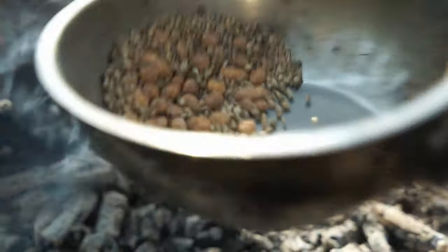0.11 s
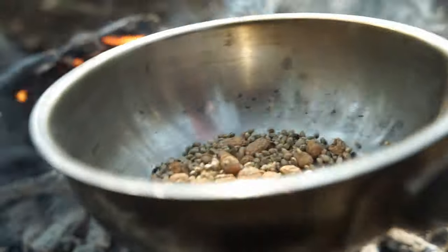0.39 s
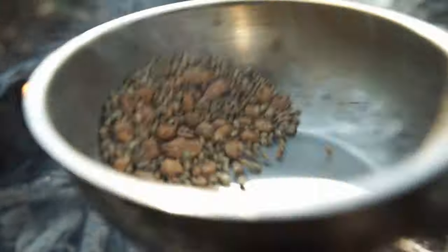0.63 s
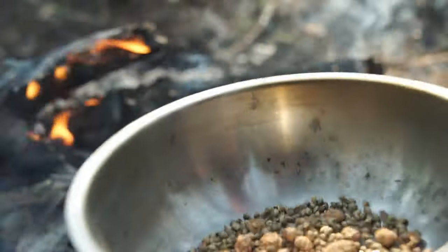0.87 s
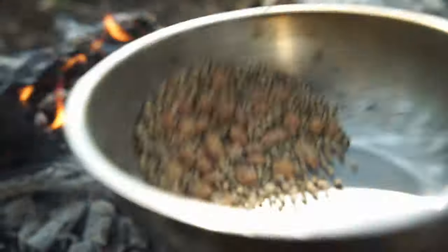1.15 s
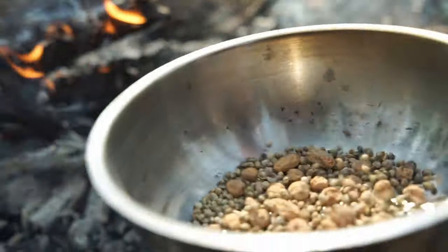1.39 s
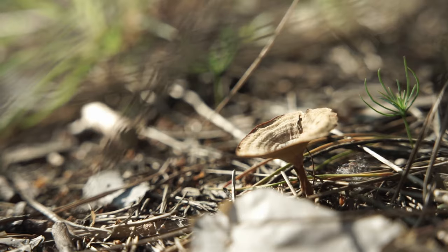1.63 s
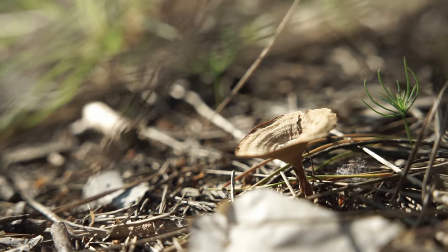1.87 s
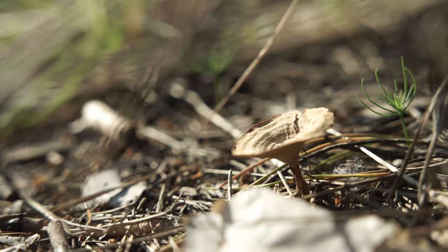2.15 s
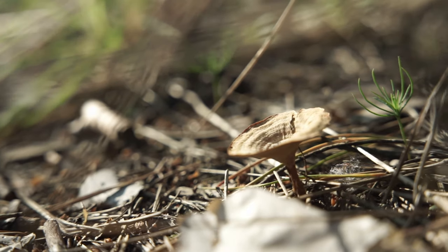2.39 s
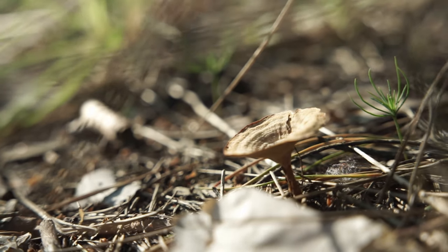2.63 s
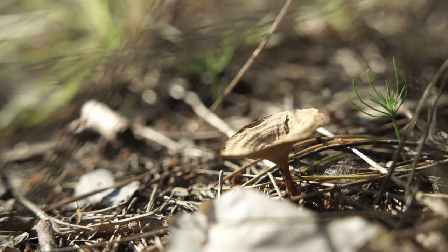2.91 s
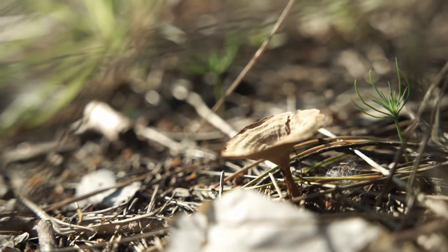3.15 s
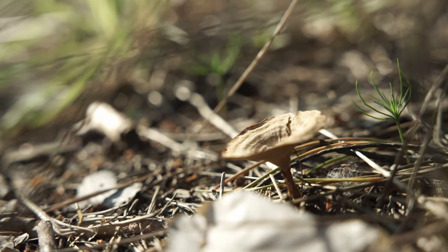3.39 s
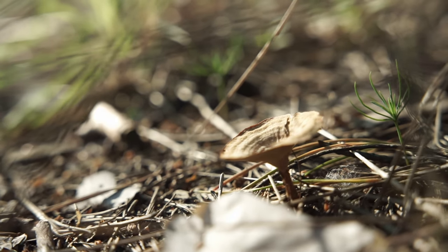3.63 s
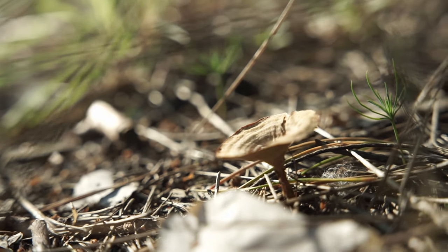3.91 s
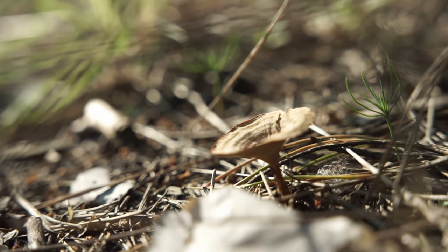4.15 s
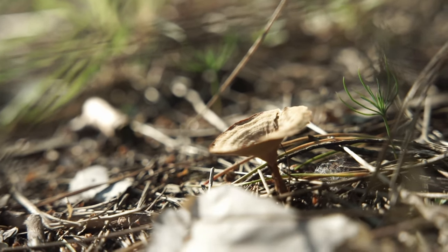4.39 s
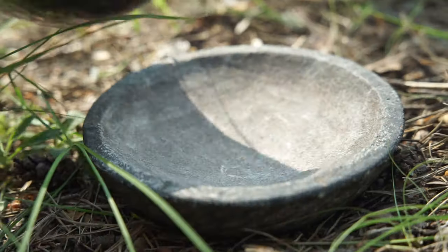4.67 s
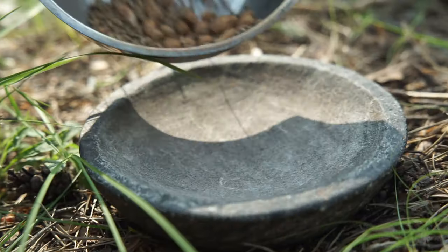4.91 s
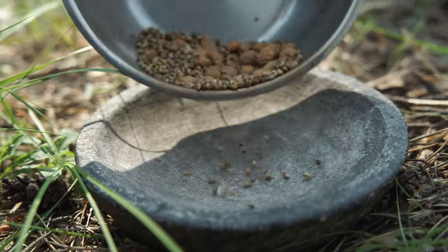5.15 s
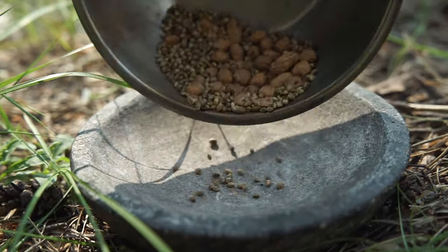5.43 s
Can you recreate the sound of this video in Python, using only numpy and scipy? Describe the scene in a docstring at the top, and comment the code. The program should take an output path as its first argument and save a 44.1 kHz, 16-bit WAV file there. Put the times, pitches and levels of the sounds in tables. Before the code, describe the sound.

Seeds and nuts are tossed rhythmically in a small steel pan with bright ringing rattles, then tipped with a thin swish into a stone bowl.

```python
"""Seeds and nuts are tossed in a small steel pan, then tipped into a stone bowl on the ground, beside a wood fire.
Random patters of impacts ring the pan's modes, thud on its floor and hiss seed on seed as the load lands and slides;
larger nuts ping out singly. In the pour the rim sings, the load swishes over the lip and seeds ping on stone.
Behind it, shaped noise makes the fire's low flutter, puffs and soft rush, and short noise spits make dry ticks."""
import sys
import numpy as np
from scipy import signal
from scipy.fft import rfft, irfft, next_fast_len
from scipy.io import wavfile
from scipy.ndimage import uniform_filter1d, map_coordinates

SR = 44100
rng = np.random.default_rng(int(sys.argv[2]) if len(sys.argv) > 2 else 0)


def persist_wave(psi):
    """Save psi, clipped to +-1, as 16-bit WAV."""
    counts = np.round(np.clip(psi, -1, 1) * 32767).astype(np.int16)
    wavfile.write(sys.argv[1], SR, np.atleast_2d(counts).T)


def boost_factor(decibels):
    """Convert a level in decibels to a linear amplitude factor."""
    exponent = np.asarray(decibels, float) / 20
    return 10 ** exponent


N = 244314

# Level of the fire background over time, dropping quieter near 1.6 s and louder again near 3.1 s.
# Each row: time in seconds, level in dB.
FIRE_LEVEL = [(0.0, -48), (0.45, -51.5), (0.69, -51.5), (1.4, -50.5), (1.56, -51), (1.64, -58.5),
              (1.84, -60.5), (2.3, -59.5), (3.02, -61.5), (3.16, -53.5), (4.78, -51), (5.0, -55.5),
              (5.31, -55), (5.54, -57)]
# Colour of the low flame flutter. Each row: frequency in Hz, relative density in dB per Hz.
FLUTTER_COLOUR = [(12, -41), (20, -12), (43, 0.5), (65, 4.5), (173, -2.5), (206, -11.5), (500, -20.5),
                  (650, -62), (1100, -120)]
# Colour of the fire's broad rush. Each row: frequency in Hz, relative density in dB per Hz.
RUSH_COLOUR = [(120, -35), (200, -3), (315, -7), (392, -11.5), (446, -12), (544, -12), (1710, -16),
               (2090, -15), (15500, -28)]
# Stereo width of the fire noise. Each row: frequency in Hz, left-right likeness from 0 to 1.
FIRE_LIKENESS = [(60, 0.96), (300, 0.75), (1000, 0.27), (3000, 0.21), (8000, 0.058)]
# Gas puffs in the fire. Each row: time in seconds, peak level in dB.
GAS_PUFFS = [(0.632, -41.5), (1.499, -49.5), (3.186, -43.5), (3.787, -49)]
# Dry ticks of stray seeds and embers. Each row: time in seconds, peak level in dB, left over right in dB,
# lower part of the tick in dB against its treble setting.
DRY_TICKS = [(0.033, -29, -6, -2), (0.2537, -29, 3, -1), (0.2907, -29, -2, 3), (0.4095, -31, 18, -5),
             (0.458, -20.5, 2, -11), (0.7677, -30, -7, -10), (0.7981, -30, -8, 7), (0.818, -22, -10.5, 9),
             (0.948, -15.5, -4, -10), (1.076, -32, -5.5, 1), (1.3244, -31, -6, 0), (1.349, -22, -14, 14),
             (1.505, -18.5, -7, -3), (1.5244, -19, -7, -7), (1.8958, -37, -6, 25), (1.986, -17.5, 3, -10),
             (2.0143, -26, -9, -12), (2.138, -31.5, 4, -21), (2.45, -35, 0, 2), (2.5696, -35.5, 1, -7),
             (2.618, -31.5, 0, -2), (2.9284, -40, -8, -11), (2.9786, -29, 0, 16), (3.11, -26, -7, -10),
             (3.51, -31, -6, 18), (3.6646, -28, -8, -13), (3.695, -36, -3, -12), (3.7524, -37, -1, -6),
             (3.999, -24.5, -5, 6), (4.1774, -34, -8, 11), (4.2704, -34, -4.5, -14), (4.2956, -35, -3, -6),
             (5.003, -36, 0, -3), (5.0659, -35, -1.5, -13), (5.24, -44, 0, -10), (5.395, -46, 0, -15)]
# Seeds dropping on the stone. Each row: time in seconds, peak level in dB.
STONE_DROPS = [(5.1106, -44), (5.12, -38), (5.1544, -44), (5.1901, -47), (5.24, -58), (5.4316, -48),
               (5.5154, -49)]
# Single larger nuts striking the steel. Each row: time in seconds, peak level in dB.
NUT_HITS = [(0.054, -38), (0.095, -22), (0.1112, -23), (0.262, -39), (0.3185, -13), (0.4038, -22),
            (0.4868, -23.5), (0.5088, -22), (0.5305, -30), (0.602, -23), (0.8095, -44), (0.822, -23),
            (0.863, -18.5), (0.8733, -8), (0.995, -33), (1.0552, -24.5), (1.0932, -22.5), (1.14, -24.5),
            (1.3413, -28), (1.3662, -31), (1.3887, -11.5), (1.417, -2), (1.468, -19), (1.512, -27),
            (1.5354, -26), (1.651, -37), (1.72, -35), (1.9159, -31), (1.9447, -24), (1.957, -23),
            (1.974, -21), (2.277, -30), (2.488, -26), (2.645, -33), (2.667, -34), (2.745, -38.5),
            (2.762, -36), (2.4769, -23), (2.98, -29), (3.0075, -27), (3.017, -24), (3.032, -22.5),
            (3.22, -35.5), (3.254, -32), (3.551, -22), (3.5793, -13), (3.63, -30), (4.0734, -42),
            (4.1022, -25.5), (4.16, -28), (4.172, -32), (4.184, -32), (4.208, -39), (4.356, -37),
            (4.456, -37), (4.522, -38), (4.883, -30), (4.908, -29), (4.914, -29)]
# Modes of the pan's bowl. Each row: frequency in Hz, width in Hz, level in dB, left over right in dB,
# phase lead of the left in radians.
BOWL_MODES = [(2887, 77, -12.5, -11, 1.1), (3036, 25, -5.5, -9, 1), (3105.4, 66, 1.5, 2, 0.2),
              (3164.5, 35.5, -2, 11.5, -0.1), (3340, 28, -0.5, 6.5, -1.8), (3770, 47, -43, 5, 16),
              (4070, 65, -23, -14, -0.5), (4400, 55, -17.5, 7, -1.5), (4710, 60, -22, 8, -0.1)]
# Modes of the pan's rim. Each row: frequency in Hz, width in Hz, level in dB, left over right in dB,
# phase lead of the left in radians.
RIM_MODES = [(5150, 89, -9, 7.5, -2.5), (5518, 38, 0, 6.5, -3), (5588, 45, 3, 2, -2),
             (7150, 140, -12.5, 3, 3.5), (7950, 110, -16.5, -11, 5.5), (8276, 25, -1, -13, 4),
             (8384, 67, -11.5, 5, -1), (10000, 16, -14, -13, 5), (11400, 120, -14.5, 4, 1.5)]
# Modes of the pan's flat floor. Each row: frequency in Hz, width in Hz, level in dB, left over right in dB,
# phase lead of the left in radians.
FLOOR_MODES = [(1070, 430, -1, 0, -0.15), (1772, 127, 1, -9, -0.33), (1925, 31, 4, -5.5, -.3)]
# Modes of the stone bowl. Each row: frequency in Hz, width in Hz, level in dB, left over right in dB,
# phase lead of the left in radians.
STONE_MODES = [(4470, 34, 2.5, 3.5, 0), (7430, 85, -11, 0.4, 0), (11020, 82, -13.5, 0.61, 0)]
# Colour of a dull thud. Each row: frequency in Hz, relative gain in dB.
THUD_COLOUR = [(250, -31.5), (500, -5.5), (1000, -1), (1600, -9), (2400, -3), (4000, -5), (7000, -16),
               (16000, -34)]
# Colour of seed on seed. Each row: frequency in Hz, relative gain in dB.
HISS_COLOUR = [(1500, -24), (4000, -6.5), (7000, -5), (9000, -1.5), (10500, 1), (12000, 4), (14000, 1),
               (15700, -0.5)]
# Colour of the load going over the lip. Each row: frequency in Hz, relative gain in dB.
SWISH_COLOUR = [(7000, -21), (9200, -13), (10200, 2), (11500, -12), (13000, -8.5), (16000, -20)]
# Rim singing as the load creeps to the lip. Each row: start in seconds, loudest moment in seconds,
# stop in seconds, level in dB.
RIM_SINGING = [(4.37, 4.45, 4.63, -64), (4.68, 4.9, 5.0, -52.5)]
# The load falls back in. Each row: heaviest moment in seconds, crash in dB, settling in dB,
# seed hiss in dB, extra on the rim in dB.
LOAD_LANDINGS = [(-.2, -40, -54, -42, 0), (0.332, -25.5, -38, -42.5, -0.5), (0.865, -22, -40, -41, -5.5),
                 (1.405, -23, -38.5, -41, 2), (1.957, -32, -54.5, -48, 5), (2.492, -37, -47.5, -52.5, -1),
                 (3.026, -32, -47.5, -51, -5), (3.565, -33, -47.5, -52.5, 3.5),
                 (4.11, -43.5, -41.5, -59.5, 1.5)]
# The load slides in the pan: tossing pushes, then the slow tilt, the tip, a faint rattle and a last hiss.
# Each row: start in seconds, busiest moment in seconds, end in seconds, scrape in dB, seed swish in dB.
LOAD_SLIDES = [(0.039, 0.104, 0.18, -36, -49.5), (0.558, 0.617, 0.71, -38.5, -44.5),
               (1.088, 1.134, 1.24, -40, -47), (1.59, 1.712, 1.793, -47.5, -61.5),
               (2.2, 2.27, 2.332, -46, -59.0), (2.72, 2.786, 2.84, -47.5, -54),
               (3.243, 3.283, 3.42, -49, -56.0), (3.76, 3.865, 3.948, -50.5, -63.0),
               (4.228, 4.413, 4.67, -50.5, -66.5), (4.684, 4.907, 5.055, -51.5, -46.0),
               (5.244, 5.355, 5.48, -63.5, -77), (5.476, 5.52, 5.594, -65, -53)]

# How each layer answers a landing: dB added to the crash, dB added to the settling,
# share from 0 to 1 that follows the hiss, fade of the settling in dB per second.
BOWL_LANDS = (-0.6, 0.54, 0.24, 24)
RIM_LANDS = (-16, -4, 0.43, 83.5)
THUD_LANDS = (-15.5, -0.2, 0.67, 79)
HISS_LANDS = (-24.5, -0.2, 0.86, 46)
# How each layer answers a slide: dB added, share from 0 to 1 that follows the swish,
# swell from the start in dB, fade to the end in dB.
BOWL_SLIDES = (0.71, 0.088, 11.5, 9.7)
RIM_SLIDES = (-14.5, 0.2, 19, 5)
THUD_SLIDES = (-7, 0.54, 8, 6.5)
HISS_SLIDES = (0, 0.83, 31, 3)

CRASH_RISE_DB_PER_S, CRASH_FALL_DB_PER_S = 497, 263.5
START_DB_PER_S, STOP_DB_PER_S = 421, 600  # edges of settling and slides; singing shares the stop
DOWN_S = 0.036  # seeds are down this long before the crash
SWISH_LEAD_S, STILL_S = 0.043, 0.013  # swish tops before a slide ends; stillness before the next slide
# the pour: the swish grows until the load has gone over
OVER_S, SING_SWELL_DB, SING_START_DB_PER_S = 5.0, 7.5, 300
SWISH_FULL_S, SWISH_DB, SWISH_SWELL_DB = 4.935, -43.5, 3
SWISH_RISE_DB_PER_S, SWISH_FALL_DB_PER_S = 160, 330
RUSH_DB = -7.5  # against the flutter
LAG_S = 0.00008  # pan sound reaches the left side later
TOP_HZ = 15800


def band_gain(x, lo_hz, hi_hz):
    """Gain that gives the mean of the channels rms 1 within a band."""
    z = rfft(np.mean(x, axis=0))
    hz = np.fft.rfftfreq(N, 1 / SR)
    in_band = (hz > lo_hz) & (hz < hi_hz)
    return 1 / np.sqrt(2 * np.sum(abs(z[in_band]) ** 2) / N ** 2)


def along(points, hz):
    """Reads a curve of (Hz, value) points on a log frequency axis."""
    f, v = np.transpose(points)
    return np.interp(np.log(hz + 1), np.log(f + 1), v)


def wobble(knots_per_s):
    """A smooth random curve through normally distributed knots."""
    return map_coordinates(rng.standard_normal(N // 200), [np.arange(N) * knots_per_s / SR])


def filtered(x, response):
    """Filters x by a complex response of frequency."""
    m = next_fast_len(N + SR // 4)
    return irfft(rfft(x, m) * response(np.fft.rfftfreq(m, 1 / SR)), m)[..., :N]


def coloured(x, spectrum):
    """Filters x causally: folding the cepstrum gives a minimum-phase filter of the given magnitude."""
    size = 2048
    gain_db = along(spectrum, np.fft.rfftfreq(size, 1 / SR))
    cepstrum = irfft(np.log(boost_factor(gain_db)), size)
    cepstrum[1:size // 2] *= 2
    cepstrum[size // 2 + 1:] = 0
    impulse = irfft(np.exp(rfft(cepstrum)), size)
    return signal.fftconvolve(x, impulse[None], axes=1)[:, :N]


def patter(per_s, spread_db):
    """Random impacts of overall rms 1; their sizes in dB follow a capped exponential law."""
    when, size = rng.random(N), rng.exponential(1, N)
    hits = (when < per_s / SR) * boost_factor(spread_db * np.minimum(size, 4))
    return hits / np.sqrt(np.mean(hits ** 2))


def blows(s, db):
    """Single impulses at given times and levels."""
    return np.bincount(np.round(s * SR).astype(int), boost_factor(db), N)[:N]


def burst(hits, t60):
    """Every hit becomes a short dying spit of noise, different on each side; t60 in seconds."""
    t = np.arange(SR // 20) / SR
    envelope = signal.fftconvolve(hits, boost_factor(-60 * t / t60)[None], axes=1)[:, :N]
    return envelope * rng.standard_normal((2, N))


def ring(hits, modes, scatter):
    """Resonant modes, each facing the two sides its own way; each hit finds a new spot and new mode strengths."""
    out = np.zeros((2, N))
    side = np.array([[1], [-1]]) / 2
    for mode_hz, width_hz, db, pan_db, lead in modes:
        def mode(f):
            resonance = 1j * f * width_hz / (mode_hz ** 2 - f * f + 1j * f * width_hz)
            return boost_factor(db + pan_db * side) * np.exp(1j * lead * side) * resonance

        out += filtered(hits * (1 + scatter * rng.standard_normal(N)), mode)
    return out


def apart(hits, alike):
    """The same hits partly different on each side, the left later: the pan is nearer the right."""
    common, own = rng.standard_normal((2, N)) * hits
    side = np.array([[1], [-1]])
    turn = np.arccos(np.clip(alike, -1, 1)) / 2
    pair = np.cos(turn) * common + np.sin(turn) * own * side
    return filtered(pair, lambda hz: np.exp(-1j * np.pi * hz * LAG_S * side))


def played(hits, db, body, lo_hz, hi_hz):
    """The level acts on the hits, so the body rings on after them; steady hits would give rms 1 in the band."""
    # half a scene of steady hits sets the gain, hence the root of two
    steady = body(np.concatenate([hits[:N // 2], np.zeros(N - N // 2)]))
    gain = band_gain(steady, lo_hz, hi_hz) / np.sqrt(2)
    return gain * body(hits * boost_factor(db))


def shape(start, top, stop, db, swell_db, fade_db, rise_db_per_s, fall_db_per_s):
    """Level in dB of movements: each sets in at start, swells to db at top, fades to stop and dies; powers add."""
    t = np.arange(0, N + 64, 64) / SR
    start, top, stop, db, fade_db = (np.reshape(v, (-1, 1)) for v in (start, top, stop, db, fade_db))
    before = np.clip((top - t) / np.maximum(top - start, 1 / SR), 0, 1)
    after = np.clip((t - top) / np.maximum(stop - top, 1 / SR), 0, 1)
    edges = rise_db_per_s * np.maximum(start - t, 0) + fall_db_per_s * np.maximum(t - stop, 0)
    level = db - swell_db * before - fade_db * after - edges
    total_db = 10 * np.log10(np.sum(boost_factor(level) ** 2, axis=0) + 1e-14)
    return np.interp(np.arange(N) / SR, t, total_db)


def patchy_noise(spectrum, patchy_db):
    """Stereo noise in patches of random gain over time and frequency, its sides less alike towards the treble."""
    z = signal.stft(rng.standard_normal((2, N)), nperseg=512)[2]
    field = uniform_filter1d(rng.standard_normal(z.shape[1:]), size=6, axis=0)
    field = uniform_filter1d(field, size=10, axis=1)
    pair = signal.istft(z * boost_factor(patchy_db * field / field.std()), nperseg=512)[1][:, :N]

    def mid_side(hz):
        turn = np.arccos(np.clip(along(FIRE_LIKENESS, hz), -1, 1)) / 2
        return boost_factor(along(spectrum, hz)) * [np.cos(turn), np.sin(turn)]

    mid, side = filtered(pair, mid_side)
    return np.array([mid + side, mid - side])


def gas_puffs():
    """Short noise spits through one broad low resonance, dulled by two one-pole lowpasses."""
    s, db = np.transpose(GAS_PUFFS)
    spits = burst(blows(s, db + 21.5)[None], 0.046)[0]
    puffs = ring(spits, [(340, 750, 0, 0, 0)], scatter=0)
    return filtered(puffs, lambda hz: 1 / (1 + 1j * hz / 600) ** 2)


def fire():
    """Low flutter of the flames, a few gas puffs, and a soft broad rush."""
    s, db = np.transpose(FIRE_LEVEL)
    level_db = np.interp(np.arange(N) / SR, s, db)
    flutter = patchy_noise(FLUTTER_COLOUR, patchy_db=-0.5)
    flutter *= band_gain(flutter, 30, 156) * boost_factor(level_db + 0.57 * wobble(7.1))
    rush = patchy_noise(RUSH_COLOUR, patchy_db=2.1)
    rush *= band_gain(rush, 310, 1800) * boost_factor(level_db + RUSH_DB)
    return flutter + gas_puffs() + rush


def ticks():
    """Dry clicks of stray seeds and embers: a treble spit of noise and a shorter, lower one."""
    s, db, pan_db, low_db = np.transpose(DRY_TICKS)

    def pair(level):
        return np.array([blows(s, level + pan_db / 2), blows(s, level - pan_db / 2)])

    treble = coloured(burst(pair(db - 9), 0.027), HISS_COLOUR)
    lower = coloured(burst(pair(db + low_db - 14), 0.012), THUD_COLOUR)
    return treble + lower


def stone():
    """Seeds ping the thick bowl, each a short rattle of rebounds with a dry tick."""
    s, db = np.transpose(STONE_DROPS)
    rattle = burst(blows(s, db + 20.5)[None], 0.05)[0]
    tick = burst(blows(s, db - 3.0) * np.ones((2, 1)), 0.013)
    return ring(rattle, STONE_MODES, scatter=1.0) + coloured(tick, HISS_COLOUR)


def pour():
    """The load slips over the lip in a dense swish with a bright peak, and the tilted rim sings."""
    swish_db = shape(SWISH_FULL_S, OVER_S, OVER_S, SWISH_DB, SWISH_SWELL_DB, 0,
                     SWISH_RISE_DB_PER_S, SWISH_FALL_DB_PER_S)
    sing_db = shape(*np.transpose(RIM_SINGING), SING_SWELL_DB, 1.5, SING_START_DB_PER_S, STOP_DB_PER_S)
    seeds = patter(10000, spread_db=4.0)
    tilted_rim = [(5660, 39, 0.5, 2.9, -0.2), (8260, 88, -6.5, 4, -0.83)]  # columns as in the rim modes
    swish = played(seeds, swish_db, lambda h: coloured(apart(h, 0.3), SWISH_COLOUR), 9430, 11500)
    singing = played(seeds, sing_db, lambda h: ring(h, tilted_rim, scatter=2.1), 5400, 6000)
    return swish + singing


def nuts():
    """Larger nuts ping singly with a thud; the soft shell makes the ring build over a millisecond."""
    s, db = np.transpose(NUT_HITS)

    def build(f):
        return (1j * f * 1300 / (3200 ** 2 - f * f + 1j * f * 1300)) ** 2

    ping = filtered(ring(blows(s, db + 31.0), BOWL_MODES, scatter=0.1), build)
    thud = coloured(blows(s, db + 8) * np.ones((2, 1)), THUD_COLOUR)
    return ping + thud


def stirred(lands, slides, on_rim=False):
    """Level of one layer through all landings and slides; a landing settles until the next slide."""
    crash_db, settle_db, hiss_share, settle_fade = lands
    slide_db, swish_share, swell_db, fade_db = slides
    peak, crash, settle, hiss, rim_db = np.transpose(LOAD_LANDINGS)
    start, busy, end, scrape, swish = np.transpose(LOAD_SLIDES)
    extra_db = on_rim * rim_db
    down = peak - DOWN_S
    rest = start[np.searchsorted(start, peak)] - STILL_S
    top = busy + swish_share * (end - SWISH_LEAD_S - busy)
    settling = settle + hiss_share * (hiss - settle) + settle_db + extra_db
    sliding = scrape + swish_share * (swish - scrape) + slide_db
    parts = [shape(peak, peak, peak, crash + crash_db + extra_db, 0, 0, CRASH_RISE_DB_PER_S, CRASH_FALL_DB_PER_S),
             shape(down, down, rest, settling, 0, settle_fade * (rest - down), START_DB_PER_S, STOP_DB_PER_S),
             shape(start, top, end, sliding, swell_db, fade_db, START_DB_PER_S, STOP_DB_PER_S)]
    return 10 * np.log10(np.sum(boost_factor(parts) ** 2, axis=0))


def load():
    """The tumbling load: one patter rings the steel and thuds, a denser one is seed on seed."""
    bowl_db = np.minimum(stirred(BOWL_LANDS, BOWL_SLIDES), -27)  # loudest moments belong to single nuts
    rim_db = stirred(RIM_LANDS, RIM_SLIDES, on_rim=True)
    thud_db = stirred(THUD_LANDS, THUD_SLIDES)
    hiss_db = stirred(HISS_LANDS, HISS_SLIDES)

    def pan_floor(h):
        return coloured(apart(h, 0.9), THUD_COLOUR) + boost_factor(-8.5) * ring(h, FLOOR_MODES, scatter=1.58)

    steel = patter(1500, spread_db=3.0)
    bowl = played(steel, bowl_db, lambda h: ring(h, BOWL_MODES, scatter=1.3), 2500, 4200)
    rim = played(steel, rim_db, lambda h: ring(h, RIM_MODES, scatter=3.2), 5500, 5830)
    thud = played(steel, thud_db, pan_floor, 490, 2360)
    seeds = patter(6000, spread_db=-2.0) * boost_factor(2.45 * wobble(40))
    hiss = played(seeds, hiss_db, lambda h: coloured(apart(h, 0.11), HISS_COLOUR), 10170, 16050)
    return bowl + rim + thud + hiss * boost_factor([[-2.2], [2.2]])  # hiss leans right


def scene():
    """All sources together, from the background to the pan."""
    return fire() + ticks() + stone() + pour() + nuts() + load()


def low_pass(x):
    """Removes everything above the highest recorded frequency."""
    return signal.sosfilt(signal.butter(12, 16990, fs=SR, output="sos"), x)


def record(dry):
    """Cuts everything from the band limit up and returns the finished mix."""
    mix = filtered(dry, lambda hz: hz < TOP_HZ)
    return low_pass(mix)


dry = scene()
out = record(dry)
persist_wave(out)
```